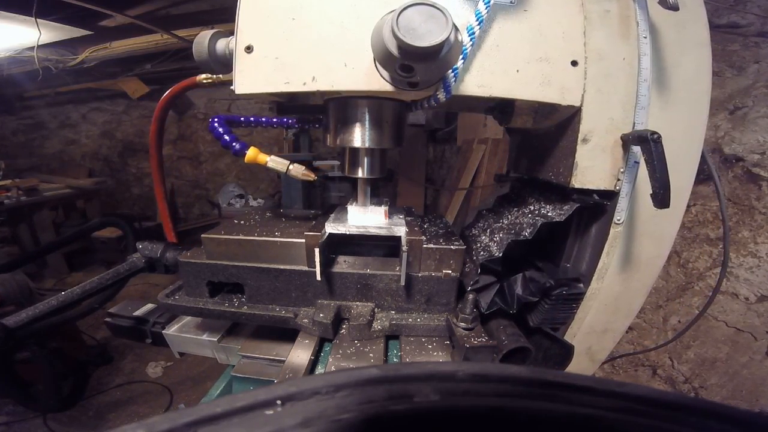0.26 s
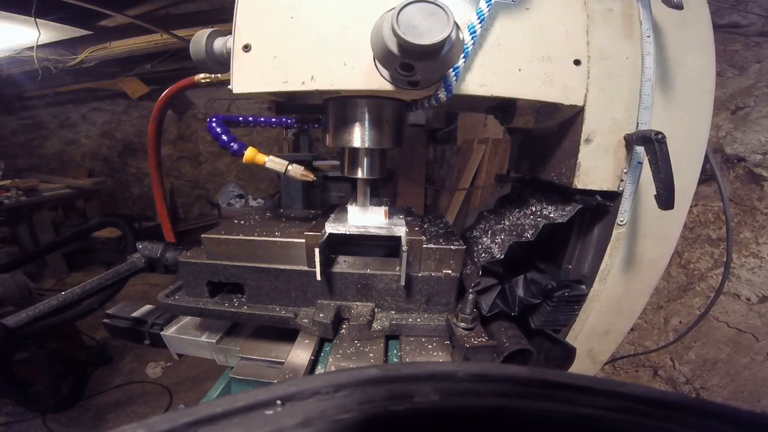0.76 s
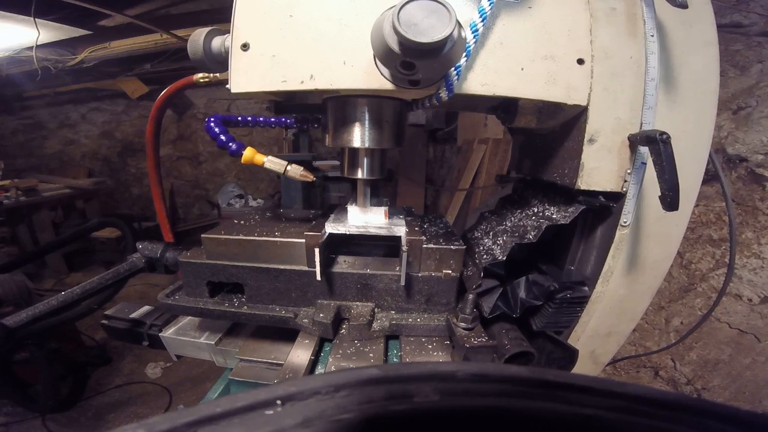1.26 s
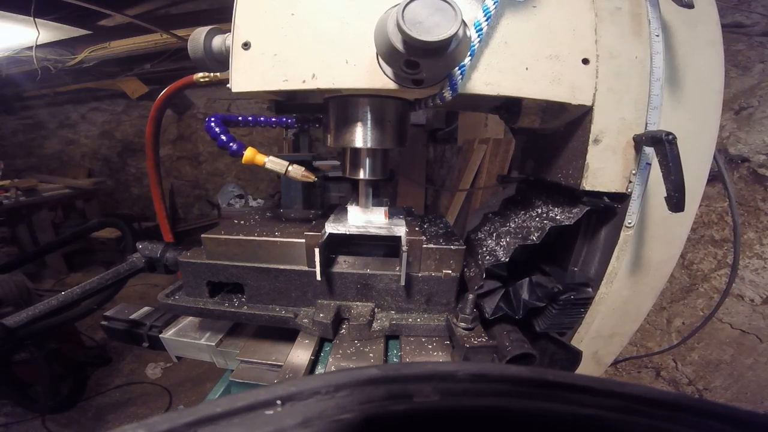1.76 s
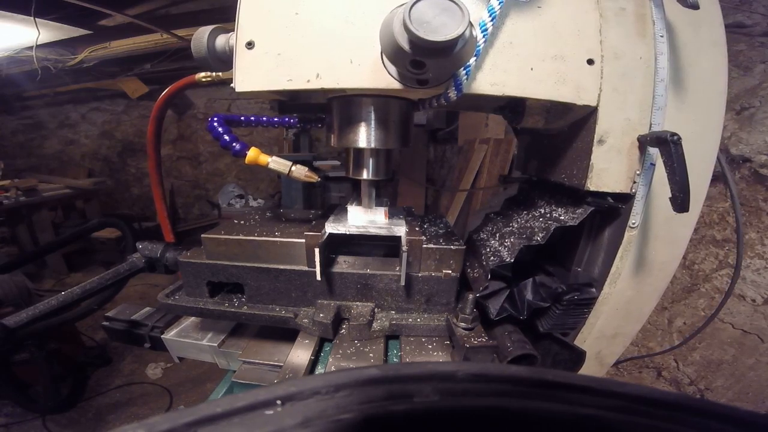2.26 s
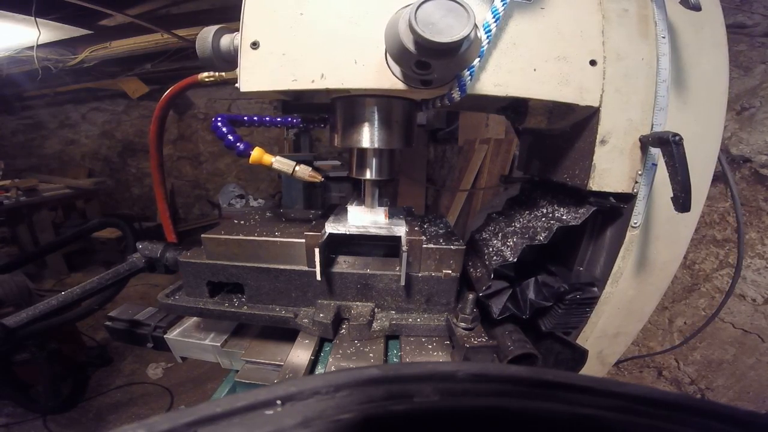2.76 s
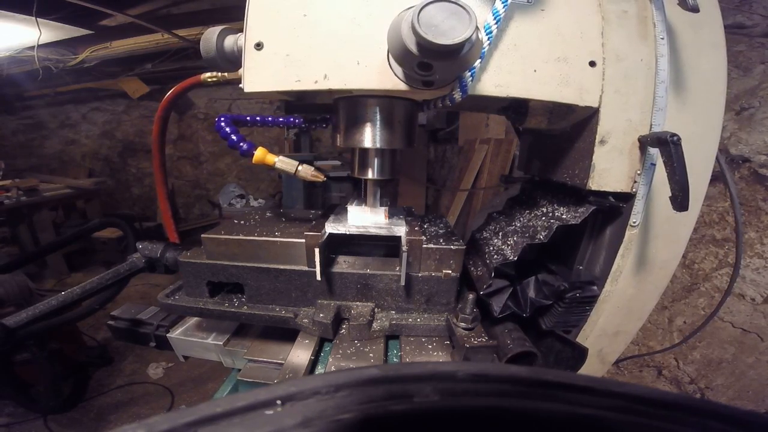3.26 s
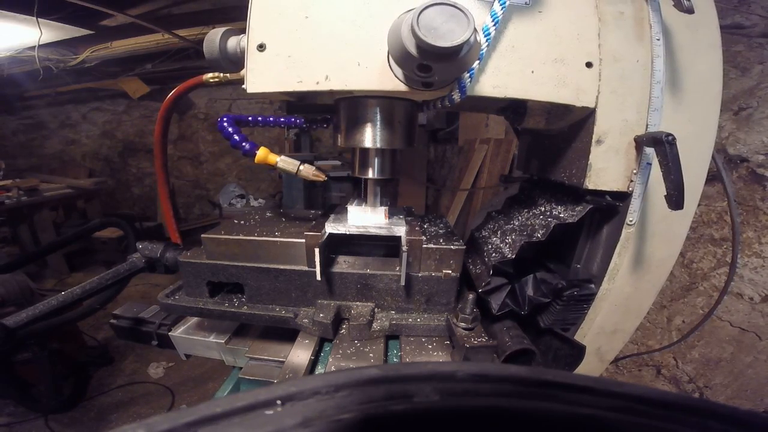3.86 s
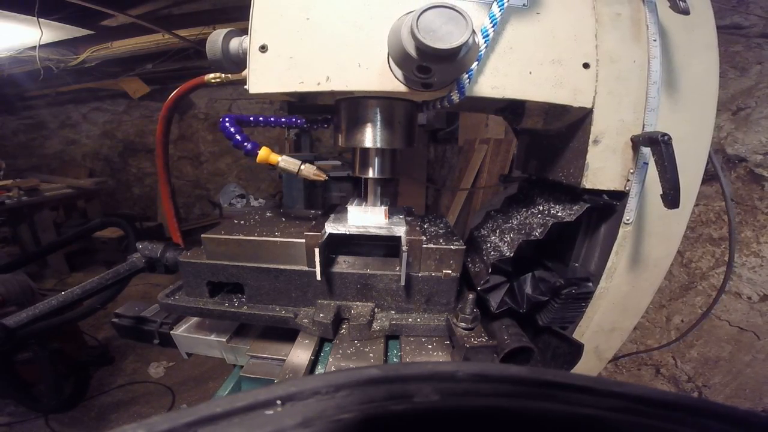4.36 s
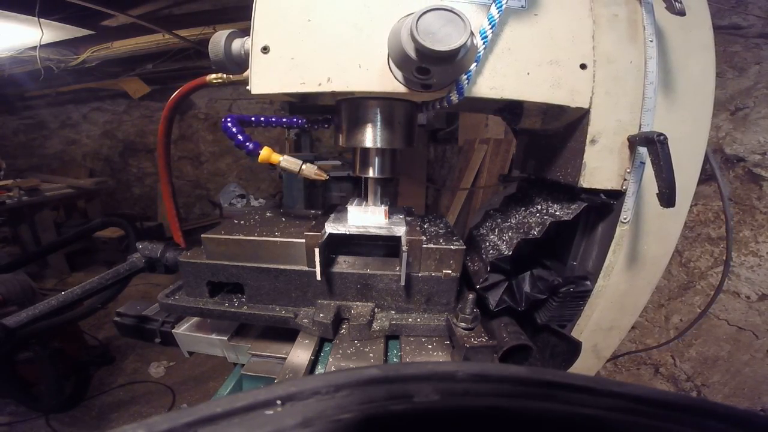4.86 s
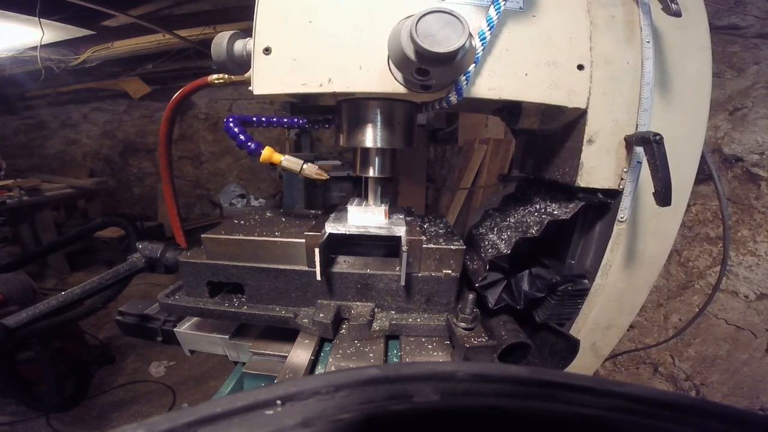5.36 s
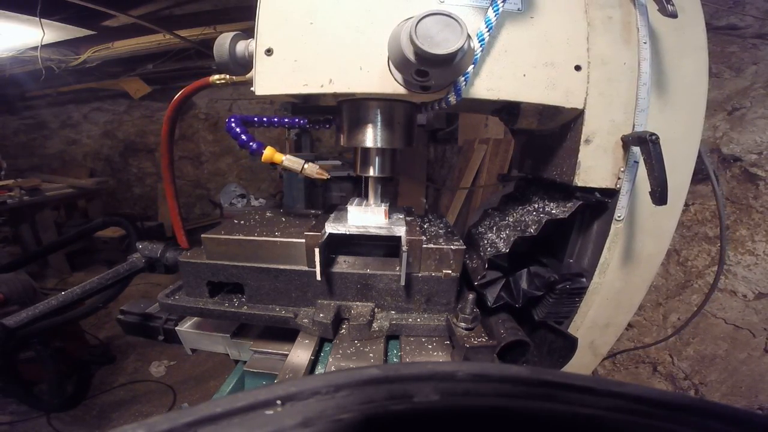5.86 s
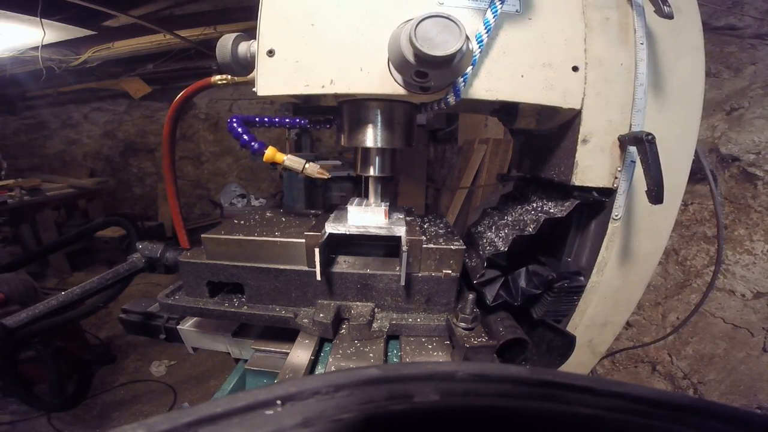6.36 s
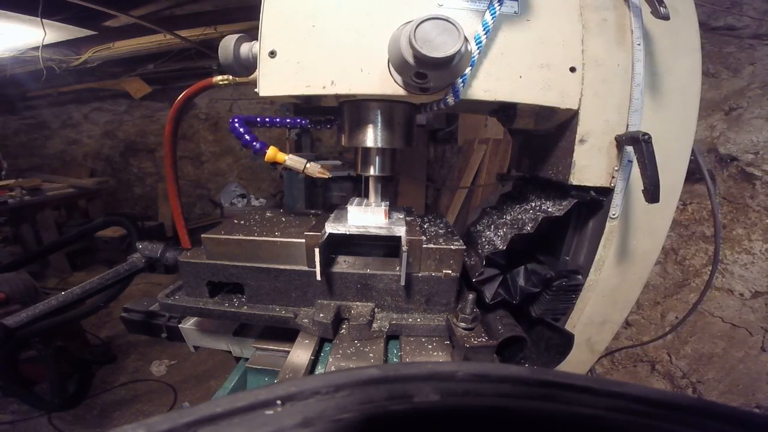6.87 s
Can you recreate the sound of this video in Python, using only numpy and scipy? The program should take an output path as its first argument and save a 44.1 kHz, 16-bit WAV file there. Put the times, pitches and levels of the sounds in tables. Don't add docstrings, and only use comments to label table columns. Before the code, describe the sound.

A continuous machine drone heard from a microphone fixed on the mill itself. Deep throbbing hum and rough motor whirr sit under an unbroken bright jet of air. After a moment of cutting the tone lightens, the table motor's low note slides down, stops and rises again amid rapid dull knocking, the cutter rubs with a brief squeal, bites, and the heavier steady buzz continues to the end.

```python
import sys
import numpy as np
from scipy import signal
from scipy.fft import rfft, irfft, next_fast_len
from scipy.io import wavfile
from scipy.ndimage import uniform_filter1d, map_coordinates

SR = 44100
rng = np.random.default_rng(int(sys.argv[2]) if len(sys.argv) > 2 else 0)


def master_out(mix):
    frames = np.transpose(np.atleast_2d(mix))
    ceiling = np.clip(frames, -1, 1)
    pcm = np.round(ceiling * 32767).astype(np.int16)
    wavfile.write(sys.argv[1], SR, pcm)


def makeup_ratio(level_db):
    decades = np.asarray(level_db, float) / 20
    return 10 ** decades


N = 313992

LEAVES_S, LEAVING_S = 0.72, 0.48
TOUCHES_S, FULL_S, ENTERING_S = 2.57, 3.03, 0.23
ARC_S, ARC_HALF_S = 2.285, 1.26


def unit(x):
    return x / np.sqrt(np.mean(x ** 2) + 1e-20)


def curves(rows):
    s, *cols = np.transpose(rows)
    return [np.interp(np.arange(N) / SR, s, c) for c in cols]


def along(points, hz):
    f, db = np.transpose(points)
    return np.interp(np.log(hz + 1), np.log(f + 1), db, -120, -120)


def wobble(rate):
    knots = rng.standard_normal(int(N * rate / SR) + 4)
    return map_coordinates(knots, [np.arange(N) * rate / SR])


def step(s, width_s):
    u = np.clip((np.arange(N) / SR - s) / abs(width_s) + 0.5, 0, 1)
    return u * u * (3 - 2 * u)


def bump(s, width_s):
    return np.exp(-((np.arange(N) / SR - s) / width_s) ** 2)


def cut(states_db, enters_s, late_s=0):
    leaving, free, entering, settled = states_db
    drift = np.clip((np.arange(N) / SR - enters_s) / (N / SR - enters_s), 0, 1)
    level_db = leaving + (free - leaving) * step(LEAVES_S + late_s, LEAVING_S)
    level_db = level_db + (entering - free) * step(enters_s, ENTERING_S)
    return level_db + (settled - entering) * drift


def filtered(x, response):
    m = next_fast_len(N + SR // 2)
    return irfft(rfft(x, m) * response(np.fft.rfftfreq(m, 1 / SR)), m)[:N]


def rush(spectrum, patchy_db, comb_db):
    z = signal.stft(rng.standard_normal(N), nperseg=1024)[2]

    def field(rows, cols):
        grain = uniform_filter1d(rng.standard_normal(z.shape), rows, 0)
        return unit(uniform_filter1d(grain, cols, 1))

    gain = makeup_ratio(patchy_db * field(10, 4) + comb_db * field(3, 160))
    noise = signal.istft(z * gain, nperseg=1024)[1][:N]
    return unit(filtered(noise, lambda hz: makeup_ratio(along(spectrum, hz))))


def tone(turns, db, unsteady_db, drift):
    level = np.sqrt(2) * makeup_ratio(db + unsteady_db * wobble(9))
    return -level * np.sin(2 * np.pi * turns + drift * wobble(6))


def spindle(turns):
    # time in seconds, level in dB.
    unbalance = [(0.06, -25.5), (0.68, -25), (1.05, -30), (1.46, -28.5), (1.97, -32.5), (2.39, -29),
                 (2.71, -33), (3.35, -28.5), (3.56, -33), (3.85, -26.5), (5.43, -27), (5.55, -27.5),
                 (5.96, -24), (6.6, -26), (7.05, -23.5)]
    # level in dB leaving the cut, free, entering, settled.
    orders = [
        (-31.5, -47.5, -34.5, -33.5),
        (-37.5, -57, -41, -42),
        (-31, -61, -34, -34),
    ]
    overtones = [-69, -58.5, -60, -67, -67, -61.5, -49, -50, -61.5, -59, -56.5, -52.5, -58, -68.5]
    # multiple of the spindle, level in dB.
    chatter = [(20, -64), (24, -66), (28, -69), (31, -62), (32, -51), (36, -56), (40, -50), (43, -58),
               (44, -58), (62, -58)]

    lap = 2 * np.pi * 0.08 * turns
    flap = np.sin(lap)
    swell = (1, 1 + 0.2 * np.cos(lap + 2 * np.pi * 0.29), 1, 1)
    enters_s = (TOUCHES_S, TOUCHES_S, FULL_S)
    lingers_s = (0.02, 0.11, -0.087)
    orders_db = curves(unbalance) + [cut(*row) for row in zip(orders, enters_s, lingers_s)]
    lag_turns = (0, 0, 0.5, 0.6)
    rock_turns = (0, 0.077, 0.057, 0.033)
    unsteady_db, drift_rad = (0.52, 1.7, 1.4, 0.48), (0.064, 0.2, 0.22, 0.1)
    sound = np.zeros(N)
    for k, db in enumerate(orders_db):
        phase = (k + 1) * turns + lag_turns[k] + rock_turns[k] * flap
        sound += swell[k] * tone(phase, db, unsteady_db[k], drift_rad[k])
    sound += tone(8 * turns, orders_db[3] - 14.5, unsteady_db=1.5, drift=0.07)

    squeal_s, squeal_half_s, squeal_db = 2.5, 0.14, 12
    rubs_s = squeal_s - squeal_half_s
    rub = step(rubs_s, 0.06) - step(squeal_s + squeal_half_s, 0.07)
    bite_db = cut((0, -5, -0.5, -3), rubs_s)
    chatter_db = cut((-1, -10.5, -1.5, 2.5), rubs_s)
    for k, db in enumerate(overtones, start=5):
        sound += tone(k * turns + rng.random(), db + bite_db, unsteady_db=2, drift=0.4)
    for k, db in chatter:
        level_db = db + chatter_db + (k == 32) * squeal_db * rub
        sound += tone(k * turns + rng.random(), level_db, unsteady_db=1.8, drift=0.35)
    return sound


def motor(turns):
    # multiple of the motor shaft, level in dB.
    shaft_lines = [(1, -50), (1.555, -46), (1.975, -46), (2.15, -50), (5, -56)]
    # multiple of the motor shaft, level in dB.
    brushes = [(18, -56), (20, -49), (21, -50)]
    # time in seconds, width in seconds, rise in dB.
    surges = [
        (1.27, .06, 2),
        (1.43, 0.044, 4.5),
        (1.64, 0.035, 2.2),
        (2.42, 0.091, 4),
    ]
    # frequency in Hz, width in Hz, level in dB.
    housing = [(1200, 200, -3), (1350, 220, 0)]
    # frequency in Hz, level in dB.
    whirr_spectrum = [(380, -46), (650, -24.5), (695, -16.5), (740, -23.5), (795, -17.5), (863, -19),
                      (997, -10.5), (1050, 0.5), (1090, -0.5), (1150, 2.5), (1240, -0.5), (1550, 5),
                      (1720, -5), (1980, -21), (2050, -16.5), (2660, -50), (4510, -120)]

    on, off = step(1.11, 0.12), step(3.49, 0.43)

    def around(before, during, after):
        return before + (during - before) * on + (after - during) * off

    shaft = 1.7875 * turns
    lines = sum(tone(k * shaft, db, unsteady_db=3, drift=0.5) for k, db in shaft_lines)
    lines = lines + off * sum(tone(k * shaft, db, unsteady_db=1.8, drift=0.3) for k, db in brushes)
    loaded_db = cut((-51, -62, -55, -51), FULL_S)
    lines = lines + tone(2.97 * shaft, loaded_db, unsteady_db=2.5, drift=0.54)

    at = np.flatnonzero(np.diff(np.floor(shaft)))
    chance = rng.standard_normal((len(at), 2))
    late = np.round(1.5 * chance[:, 0]).astype(int)
    blows = np.zeros(N)
    blows[np.clip(at + late, 0, N - 1)] = makeup_ratio(2.5 * chance[:, 1])

    def ring(f, lean_db):
        total = 0
        for k, (c, w, db) in enumerate(housing):
            sign = (-1) ** k
            total = total + sign * makeup_ratio(db + sign * lean_db) * 1j * f * w / (c * c - f * f + 1j * f * w)
        return total

    slowing = unit(filtered(blows, lambda f: ring(f, -1) ** 2))
    returning = unit(filtered(blows, lambda f: ring(f, 2) ** 2))
    back = step(ARC_S, 0.27)
    knock = (1 - back) * slowing + back * returning
    knock_db = around(-60, -39.5, -55) + sum(db * bump(s, width) for s, width, db in surges)
    knock_db = knock_db - 3.5 * bump(2.08, 0.22) - 0.2 * wobble(3.8)

    swell = 1 + 0.085 * np.cos(2 * np.pi * shaft) + 0.05 * np.cos(4 * np.pi * shaft)
    whirr = unit(swell * rush(whirr_spectrum, patchy_db=0.56, comb_db=0.8))
    return lines + makeup_ratio(knock_db) * knock + makeup_ratio(around(-36, -36.5, -36.5) - 2.5) * whirr


def frame():
    # frequency in Hz, density in dB per Hz.
    resonances = [(22, -3), (45, -11), (68, 0), (82, -11.5), (96, 6), (112, -2), (145, -8), (185, -7.5),
                  (218, -19.5), (245, -13), (330, -12.5), (390, -4.5), (465, -15), (610, -13), (650, -29.5),
                  (900, -32)]
    rumble_db = cut((-38.5, -42.5, -41.5, -41.5), TOUCHES_S) + 3.0
    rumble_db = rumble_db - 5.5 * bump(ARC_S, 0.28) + 0.55 * wobble(5.5)
    return makeup_ratio(rumble_db) * rush(resonances, patchy_db=1.1, comb_db=2.2)


def nozzle():
    # frequency in Hz, level in dB.
    body_spectrum = [(1800, -6.5), (1980, -8), (2110, 1), (2280, -1), (2370, -6), (2500, -1.5), (2850, -6),
                     (2970, 0), (3080, -4.5), (3220, 0.5), (3330, -8.5), (3500, -10.5), (3820, -4),
                     (4120, -9), (4450, -15), (4700, -51)]
    fizz_spectrum = [(4200, -28), (4450, -10.5), (4800, -4), (5000, -8), (5300, -16), (5700, -8.5),
                     (5950, -11.5), (6280, 2), (6550, -6), (6800, -9.5), (7200, -16.5), (7500, -6),
                     (7800, -6.5), (9000, -11), (9700, -15), (10100, -33)]
    top_spectrum = [(9300, -33), (9700, -10.5), (10500, -3), (10800, -3.5), (11200, -17.5), (11650, -9.5),
                    (12350, -18), (12800, -13), (13300, -14), (13800, -12.5), (14250, -21), (14800, -11),
                    (15600, -31)]
    flutter = wobble(40)
    body = makeup_ratio(-1.81 + 0.18 * flutter) * rush(body_spectrum, patchy_db=0.73, comb_db=0.97)
    fizz = makeup_ratio(-7.5 + 0.34 * flutter) * rush(fizz_spectrum, patchy_db=0.33, comb_db=1.14)
    spit = makeup_ratio(1.7 * wobble(1500))
    top = makeup_ratio(-18) * unit(spit * rush(top_spectrum, patchy_db=0.6, comb_db=2.2))
    return makeup_ratio(-37) * (body + fizz + top)


def feed():
    # time in seconds, width in seconds, share of speed lost.
    hitches = [
        (1.075, .027, .25),
        (3.52, .03, .27),
    ]
    # frequency in Hz, level in dB.
    step_response = [(30, -75), (60, -55), (75, -47), (88, -41), (97, -34), (106, -38), (118, -36),
                     (124, -37), (126, -41)]
    octave_response = [(50, -75), (80, -50), (93, -31), (118, -37), (145, -35), (175, -38), (195, -41),
                       (210, -47), (230, -45), (252, -46)]
    # frequency in Hz, level in dB.
    screw_lines = [(304.6, -62.5), (377, -50), (436.5, -50.5), (450.2, -48.5), (457, -77)]
    # middle in seconds, half length in seconds, level in dB.
    bench_passes = [
        (1.79, .28, -36),
        (2.93, .08, -44),
    ]

    t = np.arange(N) / SR
    angle = np.pi / 2 * np.clip((t - ARC_S) / ARC_HALF_S, -1, 1)
    stumble = sum(lost * bump(s, width) for s, width, lost in hitches)
    hz = 125.75 * np.abs(np.sin(angle)) * (1 - stumble)
    cycles = np.cumsum(hz) / SR
    hum = tone(cycles, along(step_response, hz), unsteady_db=1.2, drift=0.15)
    octave_db = along(octave_response, 2 * hz) - 25 * stumble
    hum = hum + tone(2 * cycles, octave_db, unsteady_db=0.9, drift=0.15)
    straight = uniform_filter1d((np.abs(t - ARC_S) > ARC_HALF_S) * 1.0, size=2000)
    screw = sum(tone(f * t, db, unsteady_db=2.5, drift=0.91) for f, db in screw_lines)
    cross = bump(2.25, 0.085) * tone(385 * t, -41.5, unsteady_db=1.1, drift=0.2)
    sings = sum(makeup_ratio(db) * (step(s - half, 0.16) - step(s + half, 0.12)) for s, half, db in bench_passes)
    bench = sings * tone(95.4 * t, 0, unsteady_db=0.8, drift=0.15)
    return hum + bench + straight * screw + cross


def scene():
    # time in seconds, turns a second.
    speed = [(0, 34.25), (.5, 34.18), (1.4, 33.8), (2.2, 33.68), (2.9, 33.52), (3.3, 33.55), (4.2, 33.82),
             (5.4, 34.02), (7.12, 34.12)]
    turns = np.cumsum(curves(speed)[0]) / SR
    return (spindle(turns) + motor(turns) + frame() + nozzle() + feed())[None]


def roll_off(x):
    return signal.sosfilt(signal.butter(12, 15210, fs=SR, output="sos"), x)


def record(dry):
    mix = filtered(dry[0], lambda hz: hz < 15260)[None]
    return roll_off(mix)


dry = scene()
out = record(dry)
master_out(out)
```